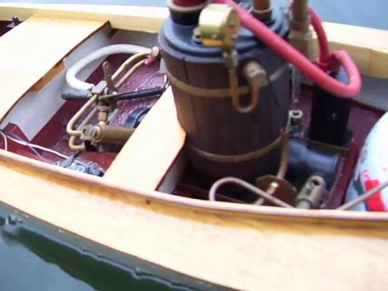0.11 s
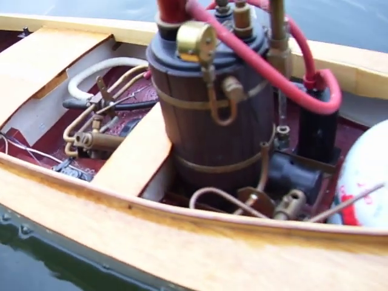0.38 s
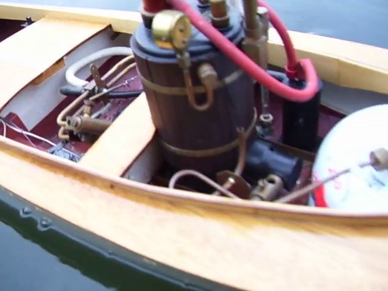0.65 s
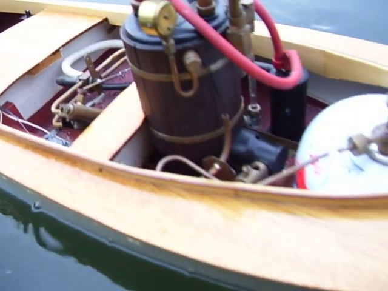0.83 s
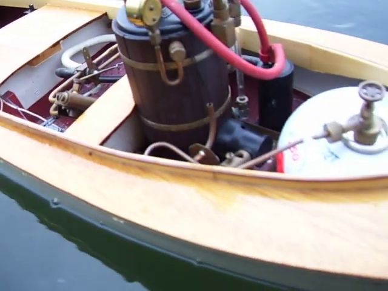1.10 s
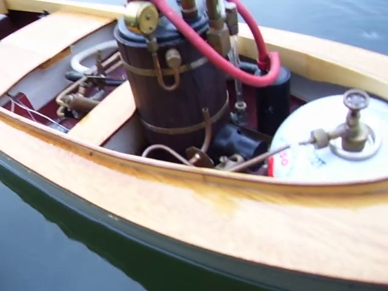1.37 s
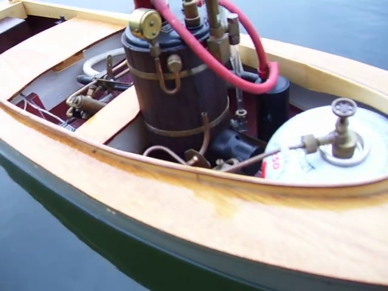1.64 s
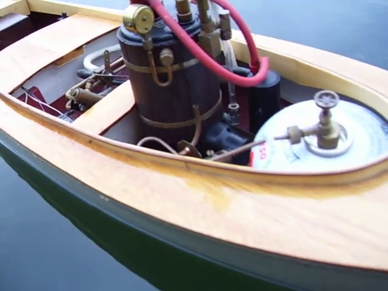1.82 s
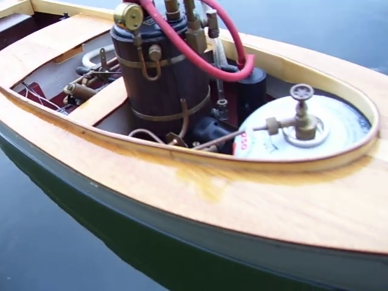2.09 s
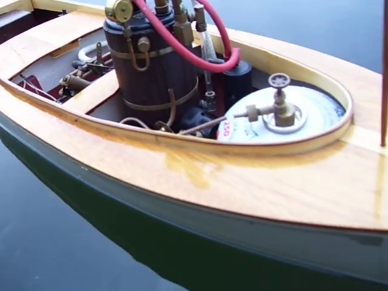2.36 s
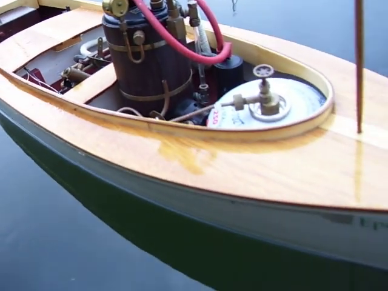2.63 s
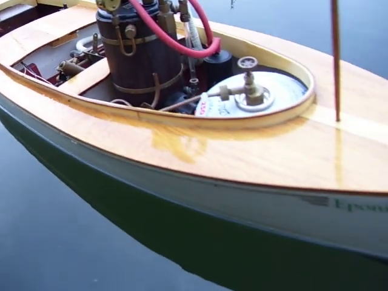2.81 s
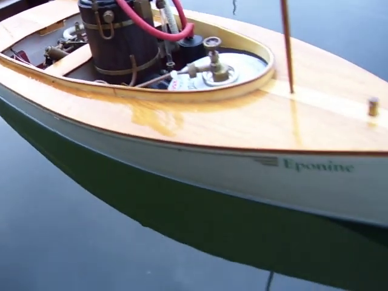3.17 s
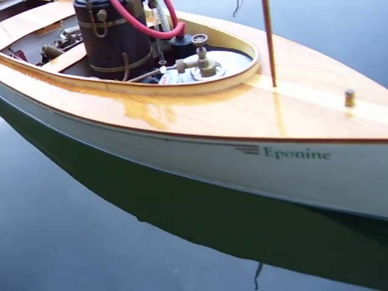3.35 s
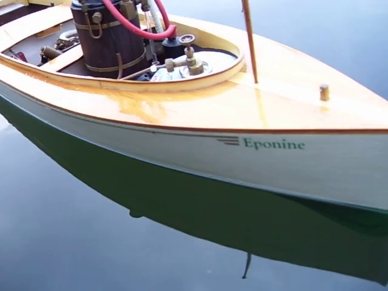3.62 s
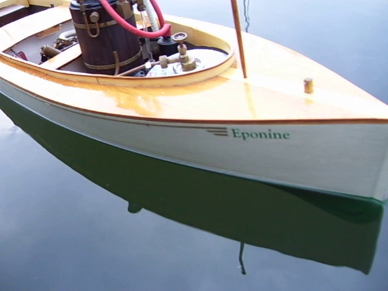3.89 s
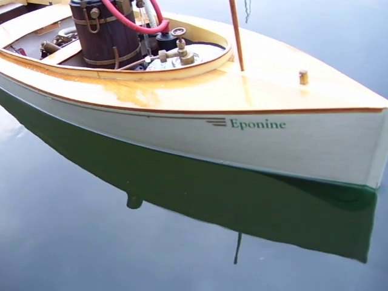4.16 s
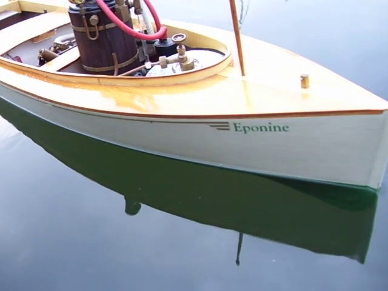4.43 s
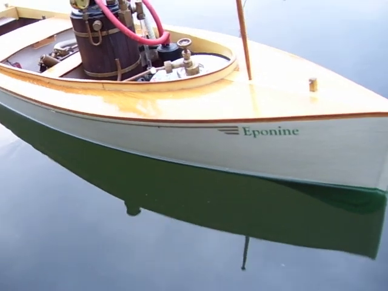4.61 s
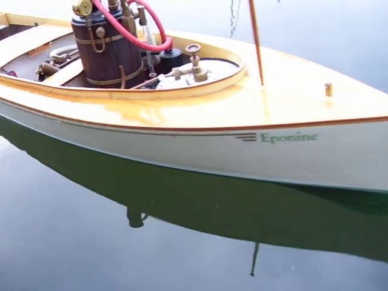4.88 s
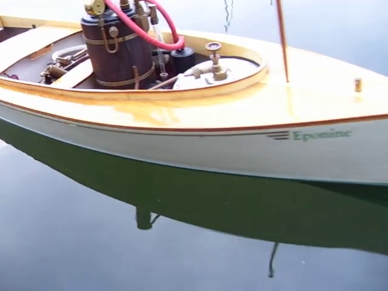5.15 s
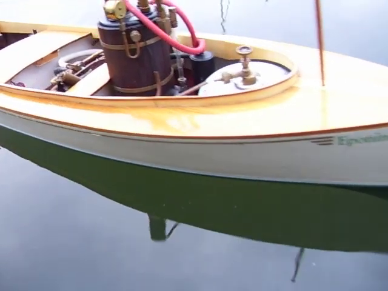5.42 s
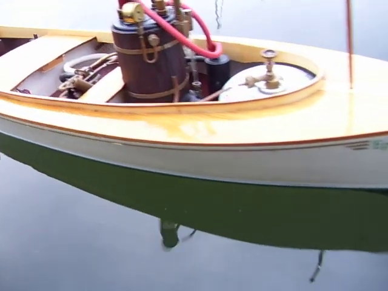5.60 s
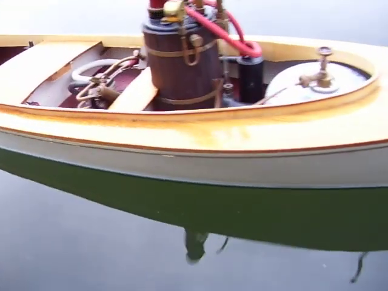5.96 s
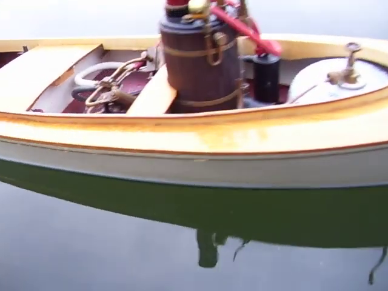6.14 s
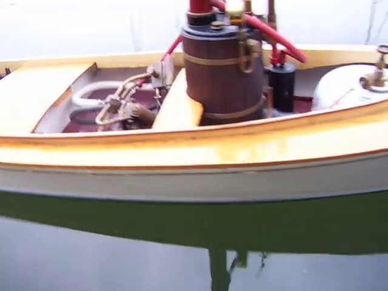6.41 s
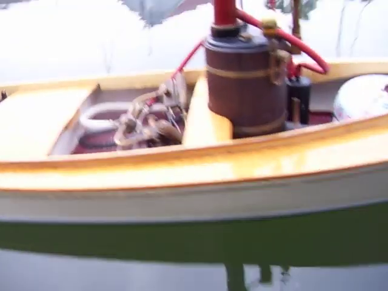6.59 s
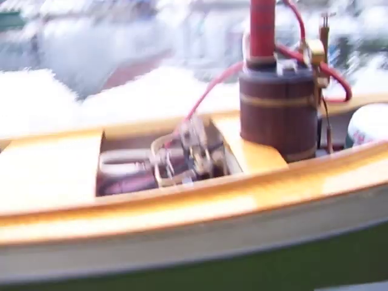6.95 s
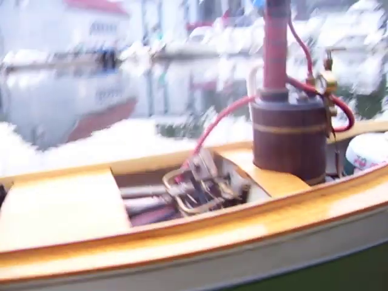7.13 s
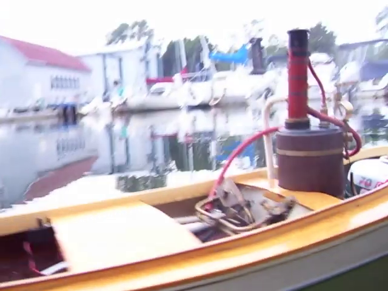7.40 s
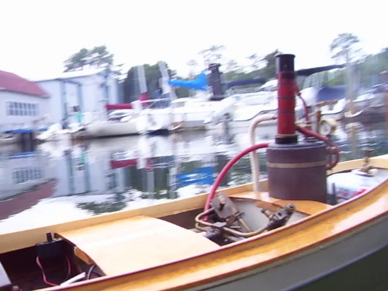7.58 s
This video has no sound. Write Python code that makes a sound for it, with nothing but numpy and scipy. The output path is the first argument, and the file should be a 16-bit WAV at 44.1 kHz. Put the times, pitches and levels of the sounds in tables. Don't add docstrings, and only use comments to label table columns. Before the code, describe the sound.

A small steam engine in a wooden model boat stutters, then clatters fast and evenly, growing louder and closer over burner roar and hissing steam.

```python
import sys
import numpy as np
from scipy import signal
from scipy.fft import rfft, irfft, next_fast_len
from scipy.io import wavfile
from scipy.ndimage import uniform_filter1d, map_coordinates

SR = 44100
rng = np.random.default_rng(int(sys.argv[2]) if len(sys.argv) > 2 else 0)


def file_out(sig):
    cols = np.atleast_2d(sig).T
    lim = np.clip(cols, -1, 1)
    pcm = np.round(lim * 32767).astype(np.int16)
    wavfile.write(sys.argv[1], SR, pcm)


def boost_factor(decibels):
    exponent = np.asarray(decibels, float) / 20
    return 10 ** exponent


N = 342216

# time_s, level_db
STEAM_FLOW = [(0, -31), (.27, -33), (.6, -40.5), (1.3, -42), (1.5, -35.5), (1.98, -39), (2.08, -43),
              (2.24, -43), (2.3, -36), (2.38, -42), (2.59, -41), (3.44, -38), (3.82, -35), (4.67, -33.5),
              (6.31, -28.5), (7.76, -38)]
# time_s, level_db
WASH = [(0, -35.5), (.3, -51), (6, -59.5), (7, -36.5), (7.76, -27.5)]
# freq_hz, level_db
FLAME_COLOUR = [(180, -42), (240, -9.5), (400, -3), (700, -5), (1000, -10.5), (1300, -14.5), (1800, -17),
                (2300, -48)]
# freq_hz, level_db
STEAM_COLOUR = [(1200, -38), (1600, -11), (2600, -4.5), (3400, -8), (4200, -8), (6000, -15)]
# freq_hz, level_db
DRUM_COLOUR = [(200, -33), (300, -4.0), (450, -0.5), (560, -25.5)]
# freq_hz, level_db
HUM_COLOUR = [(12, -58.5), (20, -29), (41, -16), (70, -8.5), (124, -5), (155, -6), (188, -2), (260, -2),
              (340, -35), (570, -120)]
# pitch_hz, width_hz, lift_db
FLUE = [(600, 55, 6.5), (890, 80, 2), (1450, 120, 8.5), (2150, 260, 6), (3250, 300, 6)]
HUM_DB, FLAME_DB = -40.5, -29.5
DRAUGHT, NEARNESS = .05, 0.12

# reversal_s, big_end_db, piston_db, crosshead_db
COMING = [(3.7473, -14, -13, -11.5), (3.8741, -11, -12.5, -9), (3.984, -14, -15, -14),
          (4.107, -14.5, -16, -16.5), (4.2251, -12.5, -14, -18), (4.348, -11, -14.5, -12),
          (4.4612, -12, -13.5, -17), (4.577, -14, -15.5, -17), (4.6936, -11, -17, -11.5),
          (4.8093, -10, -11.5, -14), (4.931, -7, -12.5, -11), (5.0505, -14, -14.5, -10),
          (5.171, -8.5, -13, -11.5), (5.2864, -7, -13, -9), (5.4026, -8, -9.5, -10.5),
          (5.5161, -6, -8, -13.5), (5.631, -8.5, -11.5, -8.5), (5.7437, -7.5, -10, -6)]
# reversal_s, big_end_db, piston_db, crosshead_db
PASSING = [(5.8538, -8.5, -12.5, -3.5), (5.9633, -7, -8, -14), (6.0738, -7.5, -8.5, -7.5),
           (6.182, -6, -8, -3), (6.293, -12, -7.5, -1.5), (6.399, -6.5, -7, -1), (6.5079, -5, -5.5, -0.1),
           (6.615, -7, -7.5, -0.4), (6.7197, -6.5, -10, -2), (6.8246, -4.5, -6, -.6), (6.93, -8, -15.5, -5),
           (7.0363, -6, -6.5, -2), (7.1404, -4.5, -9, -2.5), (7.243, -5, -7.5, -4.5),
           (7.3496, -8, -8.5, -3.5), (7.455, -14.5, -14.5, -9.5), (7.5604, -7.5, -10, -13.5),
           (7.6653, -12, -10.5, -7.5), (7.77, -10.5, -9, -9)]
# time_s, knock_db, tick_db
HUNTING = [(.004, -8.5, -16), (.026, -20, -8.5), (.049, -16.5, -19), (.083, -11.5, -12.5),
           (.1098, -12.5, -11), (.13, -16, -17), (.156, -16, -10.5), (.1897, -10, -14), (.216, -9.5, -12.5),
           (.239, -13, -17.5), (.446, -23, -30.5), (.916, -25.5, -37), (1.077, -24.5, -34),
           (1.301, -25, -32), (1.52, -15.5, -13.5), (1.557, -22, -32), (1.598, -22.5, -31),
           (1.645, -21, -19), (1.678, -13.5, -12), (1.6995, -15, -16.5), (1.74, -15.5, -18),
           (1.793, -14.5, -18.5), (1.8295, -15.5, -13.5), (1.855, -10.1, -16), (1.892, -17.5, -14),
           (1.93, -13.5, -13.5), (1.963, -12, -16.5), (2.296, -23.5, -28)]
# time_s, knock_db, tick_db
SLIPPING = [(2.499, -15.5, -17.5), (2.6085, -12.5, -23), (2.6558, -13, -11.5), (2.682, -11, -16),
            (2.7229, -17, -13), (2.78, -24, -21.5), (2.814, -16, -14.5), (2.8384, -12, -22),
            (2.8755, -15.5, -18), (2.9145, -12.5, -17.5), (2.943, -11.5, -13.5), (2.968, -14, -19),
            (2.9994, -17.5, -19), (3.0405, -13.5, -16), (3.068, -16.5, -17.5), (3.0915, -13.5, -11.5),
            (3.124, -19, -19), (3.163, -19, -17.5), (3.19, -16, -25), (3.214, -13.5, -15),
            (3.248, -27.5, -17.5), (3.284, -12, -19), (3.318, -18, -19), (3.558, -17.5, -18.5),
            (3.656, -16, -17.5), (3.667, -10.5, -25)]
# time_s, knock_db, tick_db
STRAYS = [(4.0368, -21, -15.5), (4.085, -28.5, -22.5), (4.5066, -23, -14), (4.5412, -31.5, -14.5),
          (5.265, -27.5, -11.5), (6.008, -9, -18), (6.3736, -20, -12), (6.59, -22.5, -19.5),
          (7.6035, -6, -9), (7.7473, -20, -10)]
# note_hz, hull_lag_s, tick_db, tick_db_per_knock_db, tick_db_per_wash_db
JOINTS = [
    (870, .003, -15, 0.17, 0.1448),
    (902, .003, -13, 0.33, 0.1664),
    (843.4, .0035, -18, 0.16, 0.13),
    (922, .0008, -13, 1.56, 0.09),
]
# turn_s, loss_db
REBOUND = [(.104, -8), (.111, -6.5), (.116, -13)]
BIG_END_LEAD_S, REBOUND_LAG_S = .048, .0122
CROSSHEAD_LAG_S, CROSSHEAD_SHARE = .024, .09
LOOSE_HZ, LOOSE_LAG_S = 916.3, .0028
TICK_SPREAD_DB = 4
NOTE_SPREAD, NEAR_SPREAD = .12, .012

# pitch_hz, level_db, t60_s
BRASS = [(1750, -1, .016), (2400, -.5, .013), (3200, -2, .01)]
# freq_hz, level_db
GRIT_COLOUR = [(600, -40), (1300, 6.0), (2500, 1), (4000, -3.0)]
# pitch_hz, level_db, t60_s, gain_db_per_knock_db
HULL = [(619.4, -9.5, 0.041, -0.5), (692.4, -9, 0.037, 1.03), (769, -10, 0.028, 2.07),
        (887.6, -4.5, 0.073, 0), (1064.3, -4, 0.03, -0.07), (1592, -16, .03, 1)]
# time_s, pitch_ratio
OPENING = [(.25, 1.05), (.4, 1.006), (6.9, 1.001), (7.3, 1.12), (7.76, 1.2)]
# freq_hz, level_db
SHUDDER_COLOUR = [(450, -46), (650, -11.0), (900, 1.0), (1200, 1.5), (1700, -25.0), (3500, -14.0)]

# time_s, pitch_hz, level_db
SQUEAKS = [
    [(1.44, 3250, -51), (1.49, 3270, -44), (1.535, 3315, -35)],
    [(2.26, 3270, -51), (2.3, 3420, -50), (2.35, 3380, -50)],
    [(3.32, 2750, -38), (3.36, 3190, -33), (3.4, 3304, -34), (3.44, 3420, -36.5), (3.47, 3186, -33),
     (3.52, 3283, -33.5), (3.56, 3210, -33.5), (3.6, 3150, -34)],
    [(7.672, 2890, -27), (7.695, 2990, -21), (7.72, 2860, -31.5)],
    [(6.365, 2600, -30.5), (6.395, 2650, -29)],
]
BROKEN = [8, 7, 1.1, 2.2, 3]
# time_s, peak_db
CLACKS = [
    (2.429, -3.5),
    (7.2401, 2.5),
]
# pitch_hz, level_db, t60_s
PIN = [(900, -12, .03), (1250, -7, .028), (1550, -4, .022), (1980, 0, .018), (2500, -2, .014),
       (3000, -1, .012), (3550, -1, .01), (4000, 0, .008)]

# freq_hz, level_db
RESPONSE = [(20, -2.5), (3400, 2), (3800, -7), (4200, -19), (4450, -28.5), (4700, -101.5), (22000, -100)]
# freq_hz, width_hz, level_db
WATER_DIP = [(1323, 77, -7)]


def unit(x):
    return x / np.sqrt(np.mean(x ** 2) + 1e-20)


def topped(rows):
    return rows / np.max(np.abs(rows), axis=1, keepdims=True)


def filtered(x, points, notes=()):
    m = next_fast_len(N + 8192)
    hz = np.fft.rfftfreq(m, 1 / SR)
    f, db = np.transpose(points)
    colour_db = np.interp(np.log(hz + 1), np.log(f + 1), db)
    lift_db = sum(top_db / (1 + (2 * (hz - c) / w) ** 2) for c, w, top_db in notes)
    return irfft(rfft(x, m) * boost_factor(colour_db + lift_db), m)[..., :N]


def wobble(rate):
    knots = rng.standard_normal(int(N * rate / SR) + 4)
    return map_coordinates(knots, [np.arange(N) * rate / SR])


def rings(t, hz, db, t60, rise, luck):
    swell = (1 - np.exp(-t / rise)) ** 2 * boost_factor(db[..., None] - 60 * t / t60[..., None])
    return np.sum(swell * np.sin(2 * np.pi * (hz[..., None] * t + luck[..., None])), axis=-2)


def laid(times, sounds):
    first = np.round(np.abs(times) * SR).astype(int)
    at = first[:, None] + np.arange(sounds.shape[1])
    return np.bincount(at.ravel(), sounds.ravel(), N + SR)[:N]


def rush(spectrum, patchy_db):
    z = signal.stft(rng.standard_normal(N + 512), nperseg=512)[2]
    field = uniform_filter1d(rng.standard_normal(z.shape), size=4, axis=0)
    field = uniform_filter1d(field, size=8, axis=1)
    noise = signal.istft(z * boost_factor(patchy_db * unit(field)), nperseg=512)[1]
    return unit(filtered(noise, spectrum, FLUE))


def roar():
    t = np.arange(N) / SR
    steam_db = np.interp(t, *np.transpose(STEAM_FLOW))
    wash_db = np.interp(t, *np.transpose(WASH))
    flame_db = FLAME_DB + DRAUGHT * (steam_db + 39) + NEARNESS * (wash_db + 56.5)
    flame = boost_factor(flame_db - 0.5 + 0.99 * wobble(25)) * rush(FLAME_COLOUR, patchy_db=1.0)
    leak = boost_factor(steam_db - 2.0 + 1.5 * wobble(35)) * rush(STEAM_COLOUR, patchy_db=1.5)
    drum = boost_factor(wash_db) * rush(DRUM_COLOUR, patchy_db=3.5)
    hum = boost_factor(HUM_DB) * rush(HUM_COLOUR, patchy_db=-0.9)
    return flame + leak + drum + hum


def contacts():
    s, big_end_db, piston_db, crosshead_db = np.transpose(COMING + PASSING)
    turn = np.diff(s)
    turn = np.r_[turn, turn[-1]]
    crosshead = s + CROSSHEAD_LAG_S + CROSSHEAD_SHARE * turn
    when = np.c_[s - BIG_END_LEAD_S, s, crosshead, crosshead + REBOUND_LAG_S]
    rebound_db = crosshead_db + np.interp(turn, *np.transpose(REBOUND))
    knock_db = np.c_[big_end_db, piston_db, crosshead_db, rebound_db]
    note_hz, lag, tick_db, follows, near = np.transpose(JOINTS)
    wash_db = np.interp(when, *np.transpose(WASH)) + 57
    luck = rng.random((2, *when.shape)) - .5
    tick_db = tick_db + follows * (knock_db + 9.5) + near * wash_db + TICK_SPREAD_DB * luck[0]
    note_hz = note_hz * (1 + (NOTE_SPREAD + NEAR_SPREAD * wash_db) * luck[1])
    s, loose_db, loose_tick_db = np.transpose(HUNTING + SLIPPING + STRAYS)
    loose_hz = LOOSE_HZ * np.interp(s, *np.transpose(OPENING))
    loose_hz = loose_hz * (1 + NOTE_SPREAD * rng.standard_normal(len(s)) / 2)
    ticks = np.r_[when.ravel(), s], np.r_[tick_db.ravel(), loose_tick_db]
    knock_s = np.r_[(when + lag).ravel(), s + LOOSE_LAG_S]
    knocks = knock_s, np.r_[knock_db.ravel(), loose_db], np.r_[note_hz.ravel(), loose_hz]
    return ticks, knocks


def valve_gear(s, db):
    t = np.arange(SR // 20) / SR
    luck = rng.random((len(s), 9))
    hz, level, t60 = np.transpose(BRASS)
    hz = hz * (1 + .35 * (luck[:, :3] - .5))
    level = level + 12 * (luck[:, 3:6] - .5)
    brass = topped(rings(t, hz, level, t60, 0.00014, luck[:, 6:])) * boost_factor(db[:, None] - 8)
    fade = boost_factor(db[:, None] + 3.5 - 60 * t / 0.034) * (1 - np.exp(-t / 0.00099))
    grit = rng.standard_normal(brass.shape) * fade
    start = s - .0006
    return laid(start, brass) + filtered(laid(start, grit), GRIT_COLOUR)


def hull(s, db, note_hz):
    t = np.arange(SR // 14) / SR
    luck = rng.random((len(s), 19))
    hz, level, t60, gained = np.transpose(HULL)
    hz = hz * np.interp(s, *np.transpose(OPENING))[:, None] * (1 + .06 * (luck[:, :6] - .5))
    level = level + gained * (db[:, None] + 10) + 8 * (luck[:, 6:12] - .5)
    hz, level, t60 = np.c_[note_hz, hz], np.c_[0 * s, level], np.r_[.032, t60]
    ring = topped(rings(t, hz, level, t60, 0.002, luck[:, 12:])) * boost_factor(db[:, None] - 0.3)
    fade = boost_factor(db[:, None] + 0.6 - 60 * t / 0.078) * (1 - np.exp(-t / 0.0025))
    shake = rng.standard_normal(ring.shape) * fade
    return laid(s - .0018, ring) + filtered(laid(s, shake), SHUDDER_COLOUR)


def gland():
    t, out = np.arange(N) / SR, np.zeros(N)
    for rows, broken_db in zip(SQUEAKS, BROKEN):
        s, hz, db = np.transpose(rows)
        edge = np.clip(np.minimum(t - s[0], s[-1] - t) / 0.0067, 0, 1)
        turns = np.cumsum(np.interp(t, s, hz) * (1 + .011 * wobble(300))) / SR
        slip = np.cumsum(250 + 45 * wobble(200)) / SR
        lines = np.sin(2 * np.pi * turns)
        lines += boost_factor(-4.5 + 3.5 * wobble(60)) * np.sin(2 * np.pi * (turns - slip))
        lines += boost_factor(-15.5 + 4.5 * wobble(60)) * np.sin(2 * np.pi * (turns - 2 * slip))
        lines += boost_factor(-5) * wobble(1400) * np.sin(2 * np.pi * turns)
        out += edge * boost_factor(np.interp(t, s, db) + 3.5 + broken_db * wobble(110)) * lines
    return out


def pin():
    s, db = np.transpose(CLACKS)
    hz, level, t60 = np.transpose(PIN)
    t = np.arange(SR // 20) / SR
    blow = rings(t, hz, level, t60, 0.00024, rng.random((len(s), len(hz))))
    rebound_db = level + 4.0 - (hz - 1900) ** 2 / 130000.0
    rebound = rings(t, hz, rebound_db, t60, .0006, rng.random((len(s), len(hz))))
    clack = blow + np.roll(rebound, round(0.002 * SR), axis=1)
    return laid(s, topped(clack) * boost_factor(db[:, None]))


def scene():
    ticks, knocks = contacts()
    return (roar() + valve_gear(*ticks) + hull(*knocks) + gland() + pin())[None]


def band_limit(x):
    return signal.sosfilt(signal.butter(12, 15800, fs=SR, output="sos"), x)


def record(dry):
    squashed = dry / (1 + np.abs(dry / 0.77) ** 6) ** (1 / 6)
    narrow = filtered(squashed, RESPONSE, WATER_DIP)
    mix = np.clip(narrow, -.72, .72)
    return band_limit(mix)


dry = scene()
out = record(dry)
file_out(out)
```